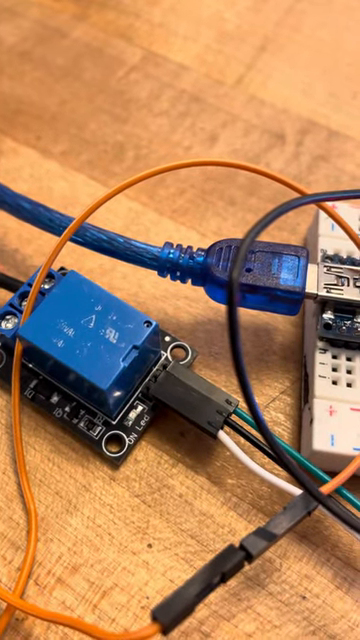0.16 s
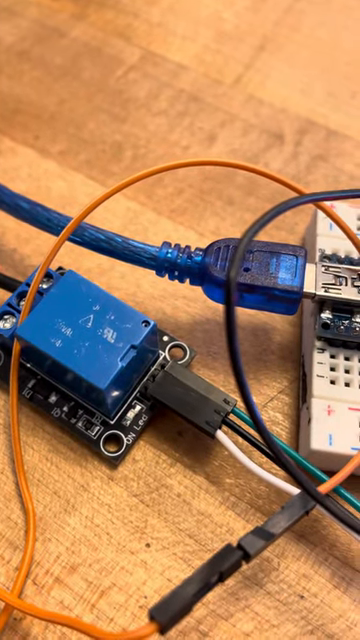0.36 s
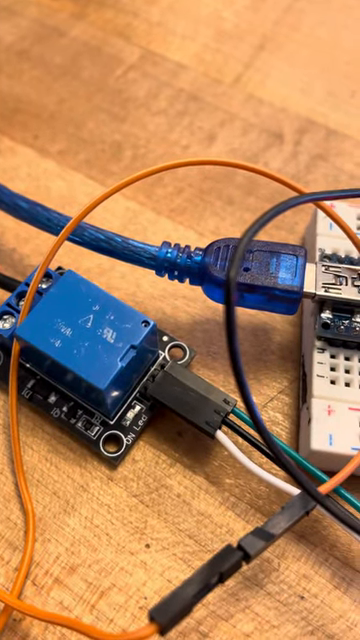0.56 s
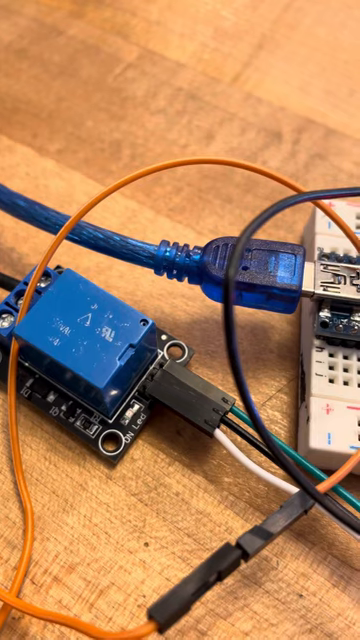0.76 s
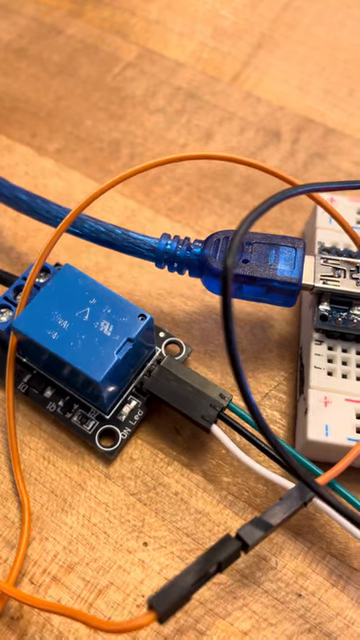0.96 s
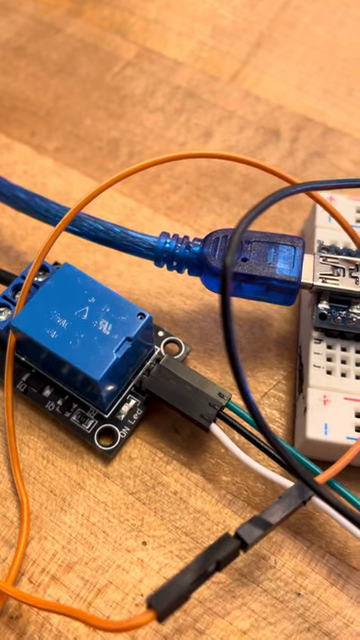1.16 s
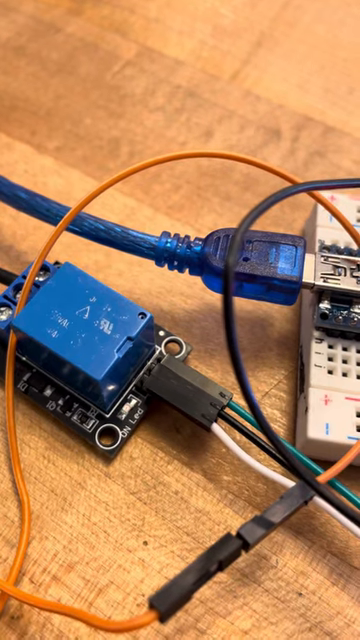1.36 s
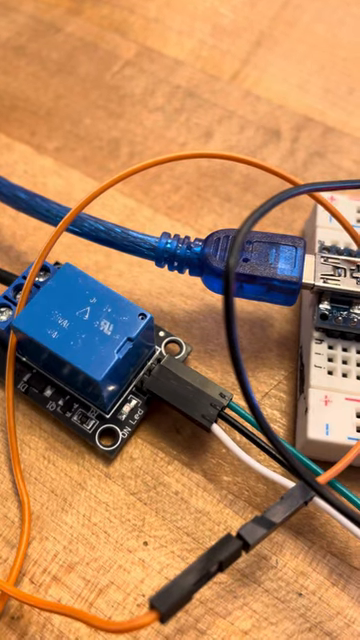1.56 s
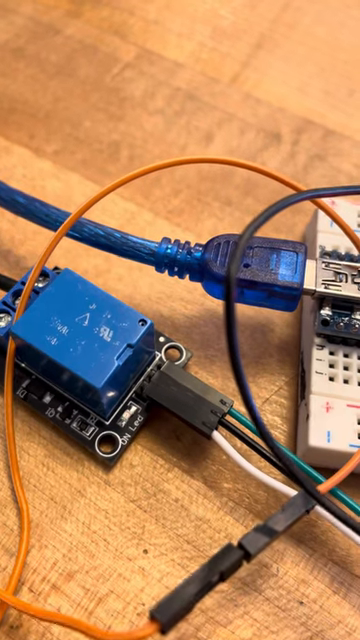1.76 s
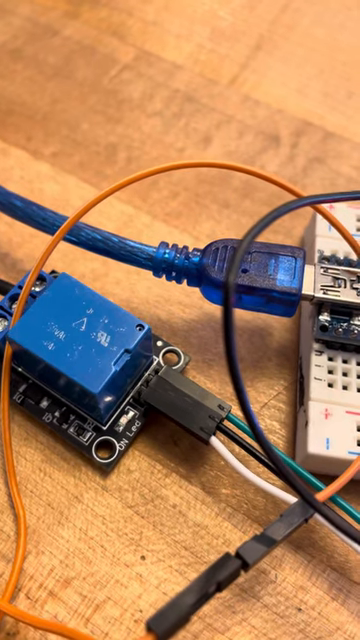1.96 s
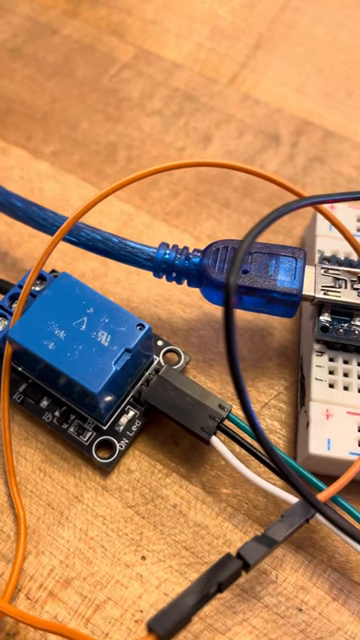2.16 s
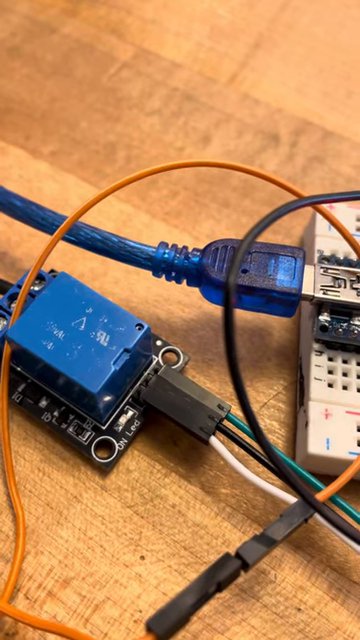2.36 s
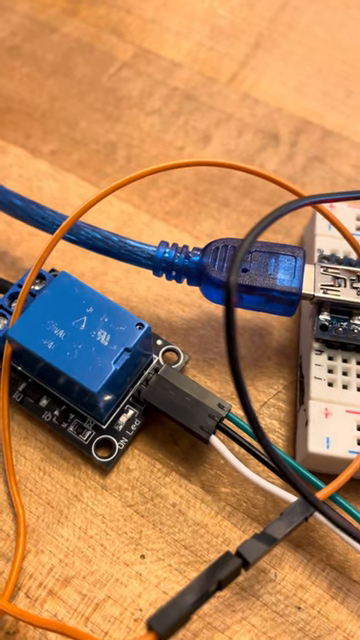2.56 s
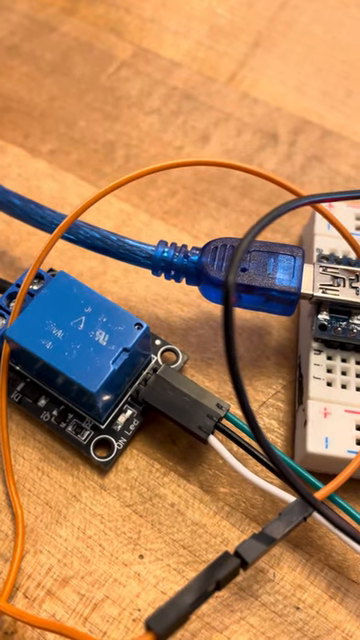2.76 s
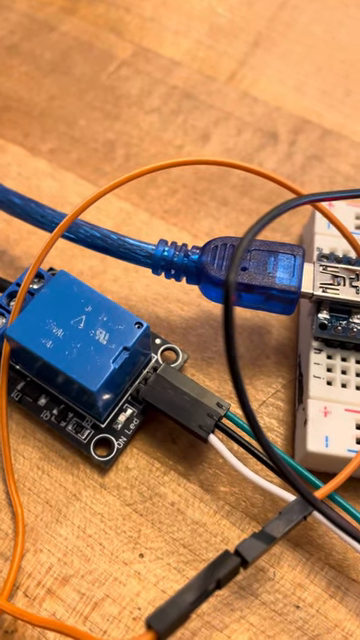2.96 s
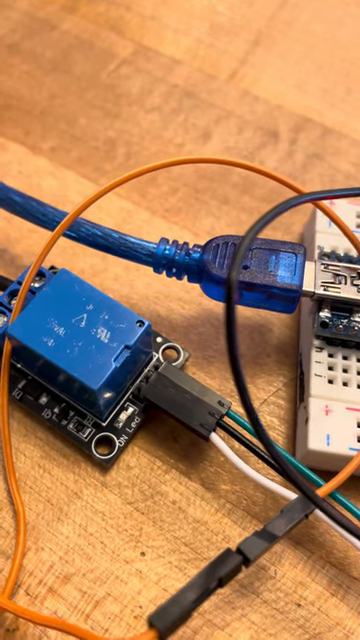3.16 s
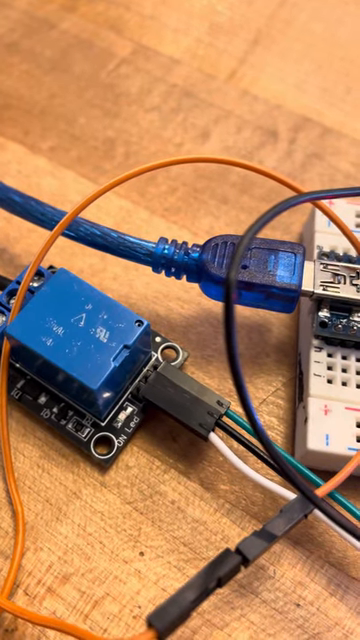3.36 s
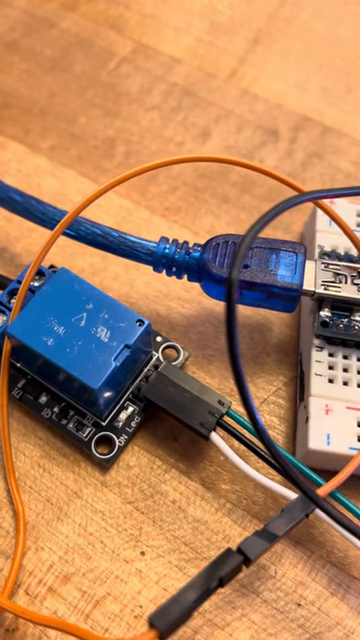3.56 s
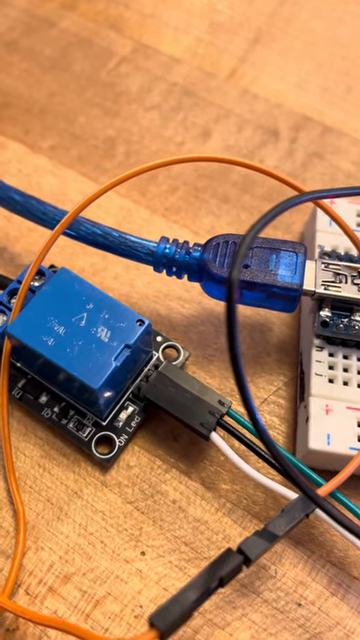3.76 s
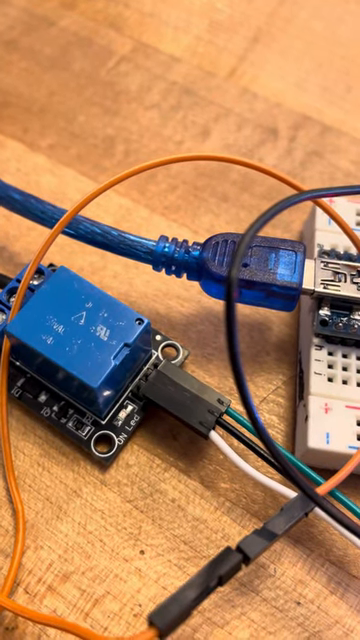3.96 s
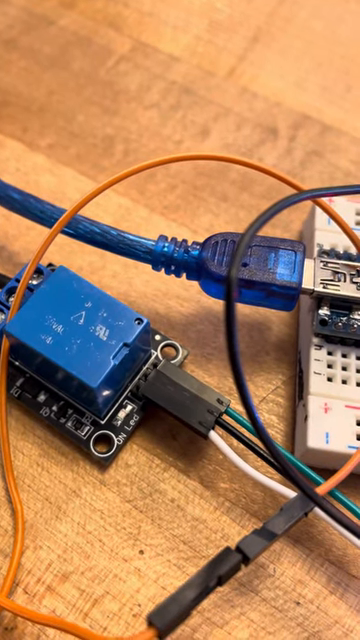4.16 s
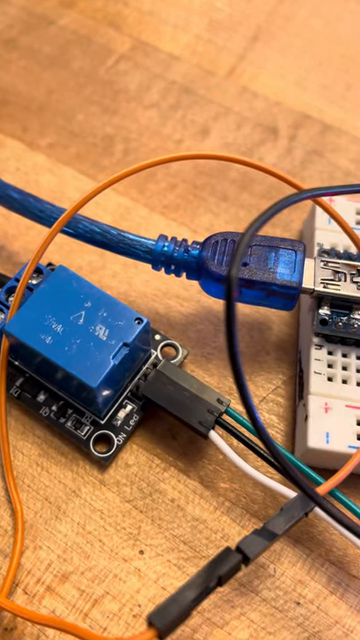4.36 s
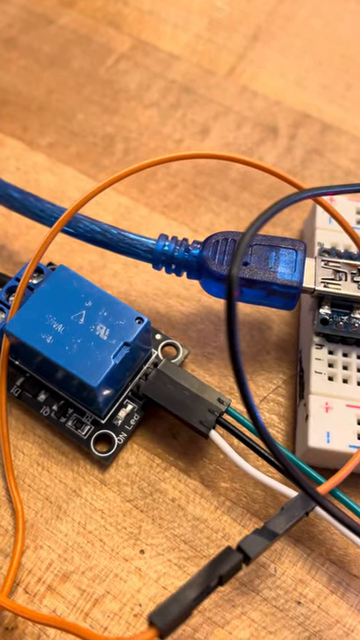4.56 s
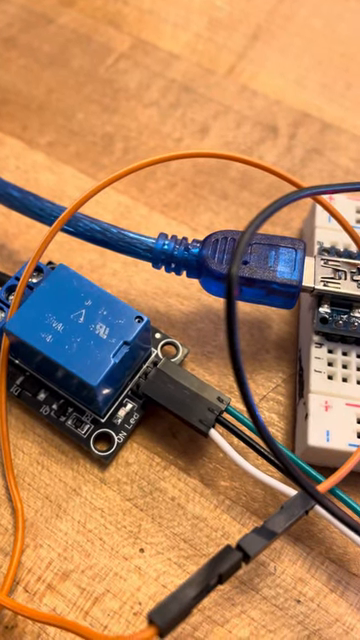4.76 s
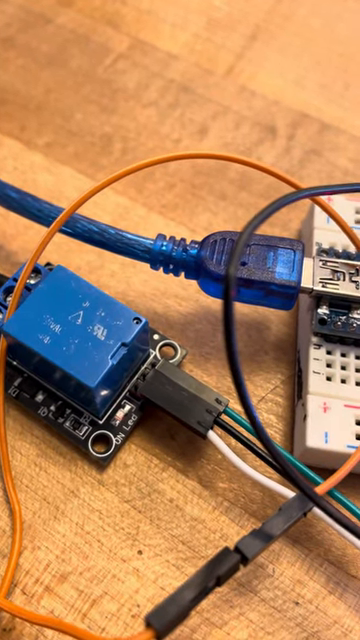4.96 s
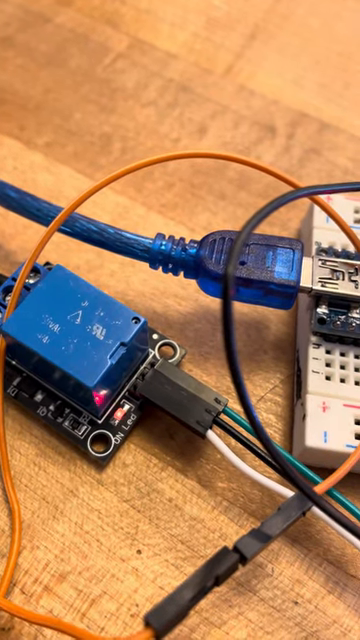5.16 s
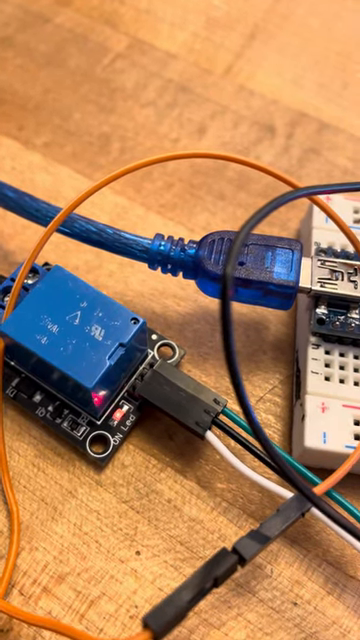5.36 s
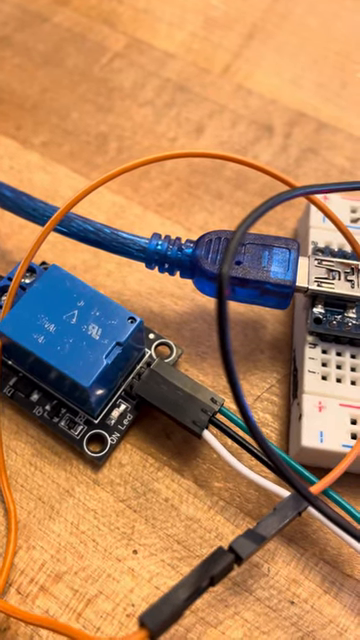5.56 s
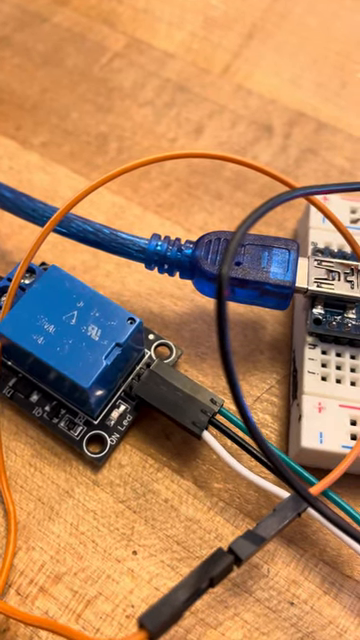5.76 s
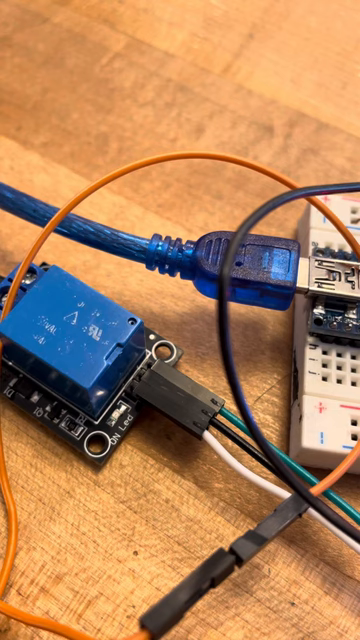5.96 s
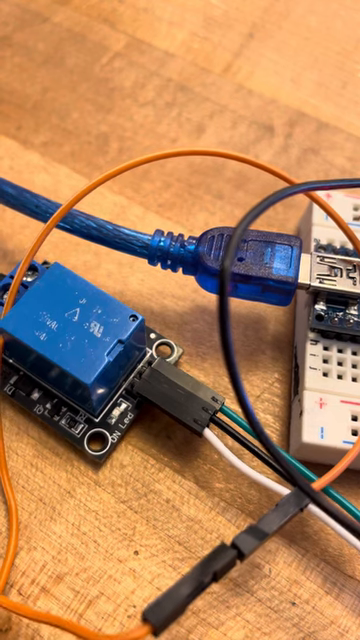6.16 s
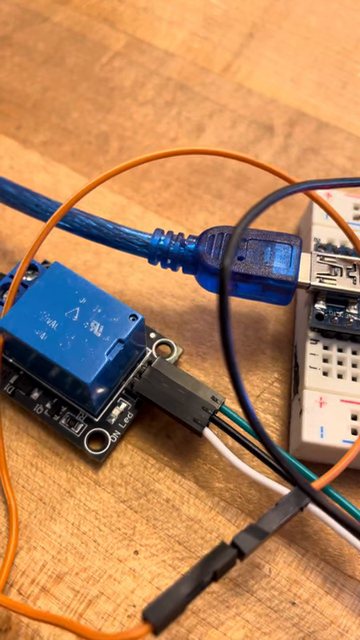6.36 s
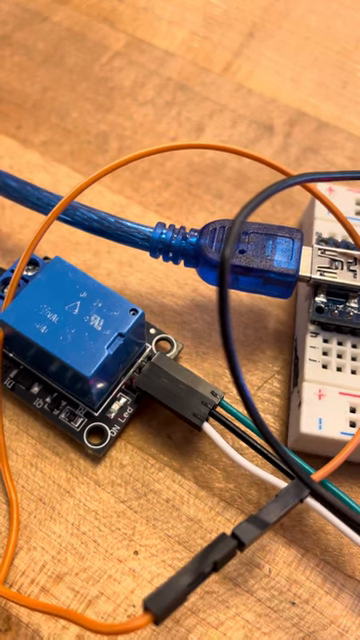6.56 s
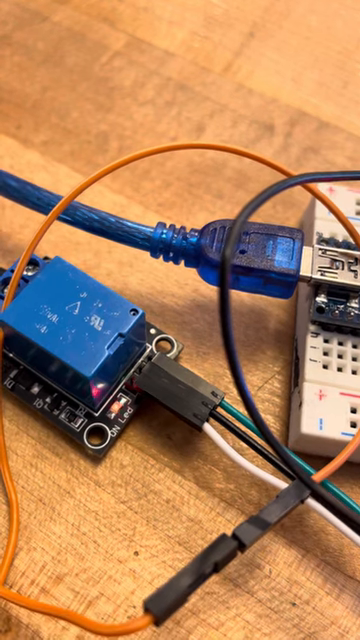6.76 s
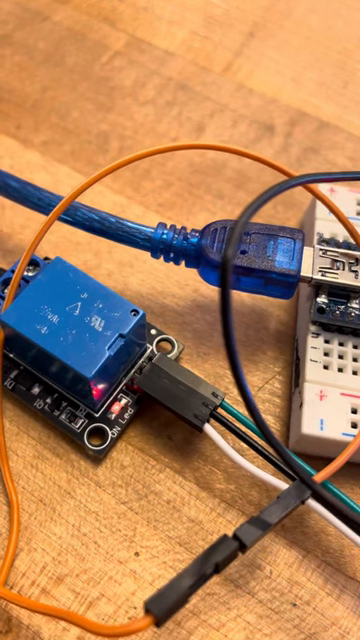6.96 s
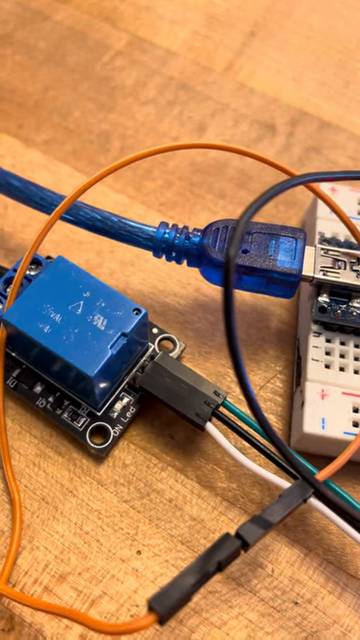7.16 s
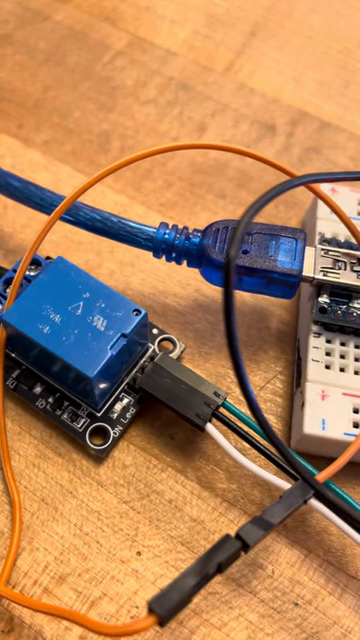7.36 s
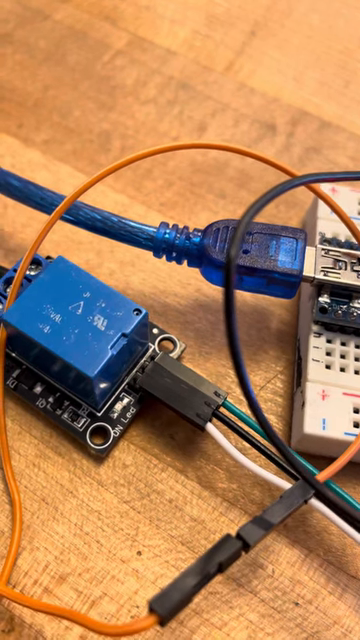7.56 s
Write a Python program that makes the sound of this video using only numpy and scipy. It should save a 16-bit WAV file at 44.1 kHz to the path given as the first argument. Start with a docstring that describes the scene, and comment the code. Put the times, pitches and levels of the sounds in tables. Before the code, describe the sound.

A steady low hum with soft rumble and very faint hiss fills a small room for about seven and a half seconds, heard by a close phone microphone. Only the hum is heard until 1.6 s, when a clicky key snaps down brightly, springs back at 1.7 s, and another follows a hard finger landing at 1.77 s, with small plastic knocks and thin springy ringing. Faint scuffs and ticks lie around 2.1 to 2.3 s, then a sharp key release at 2.36 s. One more key press clicks at 4.04 s, with a tiny scuff at 4.36 s. At 5.15 s the relay pulls in with a dull, short board-and-table knock, dropping out at 5.45 s with a brighter snap. Light fingertip rubs follow near 5.7 to 5.9 s. The relay knocks again at 6.78 s and snaps hardest at 7.07 s; a slight scuff at 7.16 s, then hum.

```python
"""Relay and keys over a hum

A small relay module on a wooden table, close by, in a room with a low hum and rumble (shaped noise).
First a few bright clicks, as of computer keys, with ticks and scuffs of a fingertip on the caps.
Then the relay pulls in and drops out twice. Clicks are rattling pushes through body colours;
board, table and key case ring as decaying modes, and the small room answers briefly.
"""
import sys
import numpy as np
from scipy import signal
from scipy.fft import rfft, irfft
from scipy.io import wavfile

SR = 44100
rng = np.random.default_rng(int(sys.argv[2]) if len(sys.argv) > 2 else 0)


def to_wav(sig):
    """Store sig (one row per channel, or 1-D mono) as 16-bit WAV at the path in sys.argv[1].

    Samples outside -1..1 are clipped; the rate is SR.
    """
    pcm = np.clip(np.atleast_2d(sig), -1, 1) * 32767
    pcm = np.round(pcm).astype(np.int16)
    wavfile.write(sys.argv[1], SR, pcm.T)  # frames by channels


N = 335601
FREQS = np.fft.rfftfreq(N, 1 / SR)
T = np.arange(SR // 2) / SR  # time axis of one blow and of the room's answer, s

# modes of the table top, rung by blows: pitch_hz, level_db, t60_s
TABLE_MODES = [(290, -8, .12), (403, -4, .12), (504, -1, .13), (572, -5, .04), (638, -10, .07),
               (706, -5, .11), (766, -7.5, .05)]
# modes of the relay's circuit board: pitch_hz, level_db, t60_s
BOARD_MODES = [(735, -6.5, .028), (853, -5, .06), (968, -4, .065), (1005, -1.5, .033), (1045, -1.5, .04),
               (1085, -6, .03), (1390, -24, .06), (1534, -22.5, .039), (2020, -28, .05), (2150, -29, .06),
               (2480, -28, .04), (2610, -28, .04), (3310, -24, .05)]
# colour of a key's snap going down: freq_hz, level_db
PRESS_SNAP_COLOUR = [(700, -13), (1300, -27), (2000, -28), (2950, -42), (3800, -28), (4400, -18),
                     (5100, -14), (5900, -7), (6900, -4), (7500, 2), (8700, 3.5), (9300, 1), (9900, 2),
                     (11000, -.5), (11600, -6), (12600, -6), (14000, -13), (15700, -15)]
# colour of a plastic knock: freq_hz, level_db
PLASTIC_COLOUR = [(700, 11), (1200, -3.5), (1900, -5), (2400, -10), (2950, -24.5), (3600, -3), (4400, 3),
                  (5300, 4.5), (6300, 0), (7200, 2), (10000, -20), (15000, -36.5)]


def undb(db):
    """Decibels to gain."""
    return 10 ** (np.asarray(db) / 20)


def curve(points, f):
    """Read (Hz, value) points on a log-frequency axis."""
    hz, value = np.transpose(points)
    return np.interp(np.log(f + 1), np.log(hz), value)


def add(out, start_s, x):
    """Mix x into out from start_s."""
    i = int(start_s * SR)
    out[i:i + len(x)] += x[:N - i]


def shape(x, points):
    """Filter x by (Hz, dB) points."""
    n = x.shape[-1]
    gain = undb(curve(points, np.fft.rfftfreq(n, 1 / SR)))
    return irfft(rfft(x) * gain, n)


def decay(t60_s):
    """Exponential decay by 60 dB in t60_s."""
    return np.exp(-np.log(1000) * T / t60_s)


def walk(rate, size):
    """Smooth noise of spread 1 that changes about rate times over its length."""
    k = np.arange(size // 2 + 1)
    y = irfft(rfft(rng.standard_normal(size)) * np.exp(-(k / rate) ** 2), size)
    return y / np.std(y)


def resonant_noise(size, hz, width_hz, order):
    """Noise in a resonance around hz, rms 1; a higher order steepens its skirts."""
    f = np.fft.rfftfreq(size, 1 / SR)
    gain = 1 / (1 + ((f - hz) / width_hz) ** 2) ** order
    y = irfft(rfft(rng.standard_normal(size)) * gain, size)
    return y / np.std(y)


def diffuse(size):
    """White stereo noise; a side/mid ratio sets how alike the channels are over frequency."""
    # side against mid: freq_hz, ratio_db
    side_ratio = [(50, -37.5), (130, -30), (260, -16), (500, -6.5), (1000, 2), (2000, -4.5), (4000, -1),
                  (12000, -41.5)]
    mid, side = rfft(rng.standard_normal((2, size)))
    w = undb(curve(side_ratio, np.fft.rfftfreq(size, 1 / SR)))
    signs = np.array([[1], [-1]])
    return irfft((mid + signs * w * side) / np.sqrt(1 + w ** 2), size)


def room(x, colour, echo_s, echo_db):
    """The room's answer: one near reflection and a diffuse tail whose treble dies first."""
    low_t60_s, treble_t60_s = 0.48, 0.24
    noise = shape(diffuse(len(T)), colour)
    low = shape(noise, [(1000, 0), (2000, -6), (6000, -30)])
    tail = low * decay(low_t60_s) + (noise - low) * decay(treble_t60_s)
    onset = 1 - np.exp(-T / 0.0015)
    tail *= onset / np.sqrt(SR * treble_t60_s / (2 * np.log(1000)))
    tail[:, int(echo_s * SR)] += undb(echo_db)
    return signal.fftconvolve(x[None], tail, axes=1)[:, :N]


def blow(rattle_ms, rattle_db):
    """A contact seats in a swell of micro-bounces, with one hard impact at its height (rattle_ms / 2)."""
    age = T * 1000 / rattle_ms
    rattle = rng.standard_normal(len(T)) * age * np.exp(-2 * age)
    push = undb(rattle_db) * rattle / np.linalg.norm(rattle)
    push[np.searchsorted(age, .5)] += 1
    return push


def strike(push, colour, tilt_db=0):
    """A push through a causal body colour; the result holds the energy of 1 ms at rms 1."""
    n = len(T)
    f = np.fft.rfftfreq(n, 1 / SR)
    tilt = tilt_db * np.log2(np.maximum(f, 1500))  # dB per octave
    bass_cut = 12 * np.log2(1 + (400 / (f + 20)) ** 2)
    gain = undb(curve(colour, f) + tilt - bass_cut)
    # fold the cepstrum for minimum phase
    cepstrum = irfft(np.log(gain), n)
    cepstrum[1:n // 2] *= 2
    cepstrum[n // 2 + 1:] = 0
    y = irfft(rfft(push, n) * np.exp(rfft(cepstrum)), n)
    return y * np.sqrt(SR / 1000 / np.sum(y ** 2))


def ring(modes, scatter_db, build_s):
    """Decaying modes, each excited afresh per blow; low ones build up slower (build_s at 1 kHz)."""
    hz, db, t60_s = np.transpose(modes)[:, :, None]
    size = undb(db + scatter_db * rng.standard_normal(hz.shape))
    rise = 1 - np.exp(-T / (build_s * (1000 / hz) ** 2))
    return np.sum(size * rise * np.sin(2 * np.pi * hz * T) * decay(t60_s), axis=0)


def sing(hz, width_hz, rise_s, t60_s):
    """A crowd of close modes around hz, as narrow noise that swells and dies away."""
    band = resonant_noise(len(T), hz, width_hz, order=2)
    return band * (1 - np.exp(-T / rise_s)) * decay(t60_s)


def hum():
    """Room rumble rippled by standing waves, a wavering hiss, and an appliance's noisy hum lines."""
    # spectrum of the rumble before ripple and trim: freq_hz, level_db_per_hz
    rumble_spectrum = [(12, -105), (35, -82.5), (60, -75), (120, -73), (240, -75.5), (285, -81), (450, -88),
                       (620, -90), (740, -94.5), (950, -101), (1350, -106), (1850, -117), (2200, -116.5),
                       (2600, -122), (3500, -124), (6000, -127.5), (14000, -137)]
    # wavering hum of an appliance: pitch_hz, half_width_hz, level_db_rms
    hum_lines = [(58.4, 3.6, -61.5), (87.05, 7, -51.5), (130, 19, -57.5), (140.2, 8.2, -55),
                 (186.1, 6.1, -56.5), (210.5, 2, -68), (257.6, 5.2, -59), (394.4, 17, -75), (511.6, 8, -77),
                 (643.3, 4.7, -78.5)]
    ripple_db, waver_db, trim_db = 2.5, 1.67, -0.54
    ripple = undb(ripple_db * walk(390, len(FREQS)) * np.minimum(FREQS / 600, 1))
    rumble = shape(diffuse(N), rumble_spectrum)
    out = irfft(rfft(rumble) * ripple, N) * np.sqrt(SR / 2) * undb(trim_db)
    for low_hz in (700, 1100):
        in_band = (FREQS > low_hz) & (FREQS < 1.55 * low_hz)
        band = irfft(rfft(out) * in_band, N)
        out = out + band * (undb(waver_db * walk(62, N)) - 1)
    for hz, half_width_hz, db in hum_lines:
        out = out + undb(db) * resonant_noise(N, hz, half_width_hz, order=1)
    return out


def scuffs():
    """A fingertip rubs the caps: swelling grains of noise, and the rubbed cap sings."""
    # soft scuffs: start_s, level_db, length_s, tilt_db_per_octave, cap_ring_hz, cap_ring_db
    scuff_events = [(2.099, -60.5, 0.037, -7, 4700, -76), (2.277, -61.5, 0.022, -2, 4960, -74),
                    (4.364, -59, 0.0031, 0.5, 4420, -90), (5.705, -57, 0.034, 6, 6050, -59),
                    (5.873, -73, 0.035, 2, 10300, -79), (7.159, -57.5, 0.036, -0.5, 5630, -63)]
    # colour of a scuff: freq_hz, level_db
    scuff_colour = [(1000, -27.5), (2800, -18.5), (4000, -4.5), (6000, 0.5), (8500, -9.5), (11000, -3.5),
                    (15000, -25.5)]
    layers = clicks, body = np.zeros((2, N))
    for s, db, length_s, tilt_db, cap_hz, cap_db in scuff_events:
        grains = rng.standard_normal(len(T)) * undb(3.6 * rng.exponential(size=len(T)))
        age = 3 * T / length_s
        rub = grains * age ** 2 * np.exp(-2 * age)
        add(clicks, s, undb(db) * strike(rub, scuff_colour, tilt_db))
        add(body, s, undb(cap_db) * sing(cap_hz, width_hz=780, rise_s=length_s / 2, t60_s=0.12))
    return layers


def touches():
    """Light ticks of touched keycaps, and one finger landing hard that rings table and board."""
    # light ticks: start_s, snap_db, plastic_knock_db
    tick_events = [(1.636, -43, -52.5), (2.1225, -52, -54.5), (2.194, -76, -70), (2.325, -54.5, -65.5),
                   (2.3338, -60, -61.5), (4.0348, -48.5, -68.5), (5.436, -58, -87)]
    # colour of the hard landing's hollow knock: freq_hz, level_db
    thud_colour = [(450, 16), (1000, 2), (1300, -16), (1900, -2), (2200, -10), (2400, 1), (2950, -13.5),
                   (3800, 2), (5000, 2.5), (7000, 0), (10000, -16), (15000, -29)]
    tick_ms = 1
    thud_s, thud_db, thud_ring_db = 1.7698, -45, -51  # just before a key press
    layers = clicks, body = np.zeros((2, N))
    for s, snap_db, knock_db in tick_events:
        push = blow(tick_ms, rattle_db=6.5)
        add(clicks, s, undb(snap_db) * strike(push, PRESS_SNAP_COLOUR))
        add(clicks, s, undb(knock_db) * strike(push, PLASTIC_COLOUR))
    add(clicks, thud_s, undb(thud_db) * strike(blow(tick_ms, rattle_db=3.5), thud_colour))
    thud_ring = ring(TABLE_MODES + BOARD_MODES, scatter_db=1.5, build_s=.0008)
    add(body, thud_s, undb(thud_ring_db) * thud_ring)
    return layers


def key_strokes():
    """Clicky switches snap down and land on the table; let go, they snap back and ring their case."""
    # keys going down: start_s, snap_db, landing_knock_db, table_thump_db, spring_ring_hz, spring_ring_db
    presses = [(1.6388, -33, -53, -54, 10200, -61), (1.7795, -31, -44, -51, 5800, -59),
               (4.036, -32, -62, -68, 6300, -59)]
    # keys springing back: start_s, snap_db, landing_knock_db, case_ring_db, table_thump_db
    releases = [(1.7016, -30, -47, -53, -56), (2.359, -31, -41.5, -53.5, -54.5)]
    # colour of a key's snap back: freq_hz, level_db
    release_colour = [(700, -12), (1300, -24), (2000, -22), (2950, -36), (4400, -13), (5400, -7),
                      (6200, -8), (7000, -11), (8100, -10), (8800, 1), (9500, 4.5), (10100, 0), (11100, -1),
                      (11800, -11), (12600, -2), (13600, -10), (15500, -14)]
    # key case and, in the treble, its springs: pitch_hz, level_db, t60_s
    case_modes = [(822, -6, .06), (841, 5, .27), (1036, -8, .12), (1150, -4, .08), (1197, -5, .1),
                  (1500, -13, .08), (1586, -10, .14), (1755, -9, .11), (2293, -18, .13), (4270, -16, .1),
                  (4650, -16, .14), (4890, -15, .14), (5324, -7, .07), (5825, -17, .14), (6300, -18, .1),
                  (8840, -12, .2), (9460, -10, .25), (9830, -12, .25), (10410, -15, .22), (10860, -15, .19),
                  (11250, -16, .18), (12540, -10, .18), (12920, -16, .14)]
    snap_ms, land_ms = 1.5, 3.8  # rattle times
    land_delay_s, chatter_db = 0.0014, -9.5  # bright chatter of the landing, against the snap
    layers = clicks, body = np.zeros((2, N))
    strokes = []
    for s, snap_db, knock_db, table_db, spring_hz, spring_db in presses:
        strokes.append((s, snap_db, knock_db, table_db, PRESS_SNAP_COLOUR))
        spring = sing(spring_hz, width_hz=660, rise_s=0.0018, t60_s=0.247)
        add(body, s + land_delay_s, undb(spring_db) * spring)
    for s, snap_db, knock_db, case_db, table_db in releases:
        strokes.append((s, snap_db, knock_db, table_db, release_colour))
        case = ring(case_modes, scatter_db=1., build_s=.002)
        add(body, s + land_delay_s, undb(case_db) * case)
    for s, snap_db, knock_db, table_db, colour in strokes:
        land_s = s + land_delay_s
        snap = strike(blow(snap_ms, rattle_db=3), colour)
        chatter = strike(blow(land_ms, rattle_db=3.5), colour)
        knock = strike(blow(land_ms, rattle_db=5), PLASTIC_COLOUR)
        thump = ring(TABLE_MODES, scatter_db=2, build_s=.0008)
        add(clicks, s, undb(snap_db) * snap)
        add(clicks, land_s, undb(snap_db + chatter_db) * chatter)
        add(clicks, land_s, undb(knock_db) * knock)
        add(body, land_s, undb(table_db) * thump)
    return layers


def keys():
    """Scuffs, touches and strokes in the room, which answers the ringing bodies 10 dB less."""
    # strength of the room's answer to the keys: freq_hz, level_db
    key_room = [(400, 1), (1100, -2), (2000, -3.5), (3000, -1.5), (4400, -11.5), (6200, -13), (9500, -8.5),
                (12800, -9), (14000, -14), (15500, -16.5)]
    clicks, body = scuffs() + touches() + key_strokes()
    return clicks + body + room(clicks + undb(-10) * body, key_room, echo_s=0.0092, echo_db=-18)


def relay():
    """Pulling in gives a dull knock; the spring throws the armature back with a sharp snap."""
    # relay cycles: pull_in_s, drop_out_s, drop_out_snap_db
    cycles = [(5.1505, 5.4506, -35), (6.7798, 7.0713, -29.3)]
    # colour of the relay's housing as it opens (drop-out): freq_hz, level_db
    open_colour = [(700, -6), (1050, -8), (1250, -15), (1520, -11), (1720, -19), (2030, -7), (2280, -11),
                   (2550, -4), (2850, -8), (3300, -4), (3600, -6), (4110, 2), (4450, -2), (4850, 0),
                   (5600, -1), (6000, -11), (6280, -4), (6750, -10), (7400, -7), (8500, -14), (9200, -14),
                   (10000, -10), (11800, -15), (13500, -23), (15500, -40)]
    # colour of the housing as it closes (pull-in): freq_hz, level_db
    close_colour = [(700, -3), (1050, -6), (1300, -18), (1500, -16), (1750, -22), (2050, -17), (2450, -14),
                    (2850, -21), (3400, -21), (4110, -14), (4950, -31), (5450, -24), (6800, -33),
                    (8800, -28), (10000, -21), (10700, -27), (11500, -21), (13000, -29), (15500, -45)]
    # left minus right of the direct sound: freq_hz, difference_db
    pan_points = [(200, 3.5), (700, -13.5), (1300, 4), (2400, -5), (4400, -2.5), (8000, 1)]
    # lead of the left channel in the direct sound: freq_hz, lead_rad
    lead_points = [(1900, 0), (2850, -2.7), (3500, -4.3), (4600, -5.2), (5500, -6.28)]
    # strength of the room's answer to the relay: freq_hz, level_db
    relay_room = [(400, -1), (700, -7), (1050, -6.5), (1600, -8), (2100, -12), (2600, -12.5), (3100, -10.5),
                  (4110, -16.5), (4800, -15), (5600, -16), (10000, -17), (15000, -20)]
    pull_db, pull_ring_db, drop_ring_db = -48, -46.5, -44
    spread_s = .0011  # travel time of a bending wave through the board at 4 kHz
    dry_relay = np.zeros(N)
    for pull_s, drop_s, drop_db in cycles:
        pull = (pull_s, pull_db, pull_ring_db, close_colour)
        drop = (drop_s, drop_db, drop_ring_db, open_colour)
        for s, db, ring_db, colour in (pull, drop):
            click = strike(blow(rattle_ms=1.9, rattle_db=-7), colour)
            board = ring(TABLE_MODES + BOARD_MODES, scatter_db=2., build_s=0.001)
            add(dry_relay, s, undb(db) * click)
            add(dry_relay, s, undb(ring_db) * board)
    # bending waves carry the treble fastest, so each direct click is drawn out a little
    bending = np.exp(-4j * np.pi * spread_s * np.sqrt(4000 * FREQS))
    pan, lead = curve(pan_points, FREQS), curve(lead_points, FREQS)
    channels = undb(np.array([pan, -pan]) / 2) * np.exp(1j * np.array([lead, 0 * lead]))
    direct = irfft(rfft(dry_relay) * bending * channels, N)
    return direct + room(dry_relay, relay_room, echo_s=0.013, echo_db=-28.5)


def scene():
    """Hum, keys and relay together."""
    return hum() + keys() + relay()


def record(dry):
    """A phone's two microphone channels drift apart in phase in the treble; a low-pass cuts the top."""
    # phase between the channels: freq_hz, left_lead_rad
    port_phase = [(20, 0), (4400, 0), (5700, 1.2), (7600, 3.14), (11000, 6.28), (16000, 10.3)]
    top_hz = 15800
    lead = np.interp(FREQS, *np.transpose(port_phase))
    ports = irfft(rfft(dry) * np.exp(.5j * np.array([lead, -lead])), N)
    return signal.sosfilt(signal.ellip(8, .2, 70, top_hz, fs=SR, output="sos"), ports)


dry = scene()
out = record(dry)
to_wav(out)
```